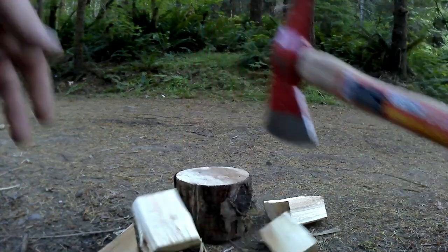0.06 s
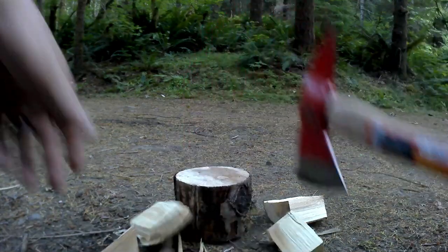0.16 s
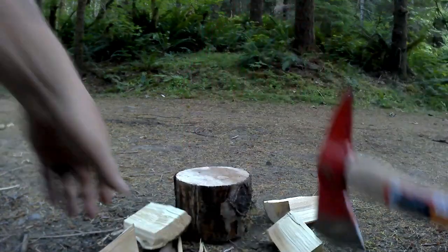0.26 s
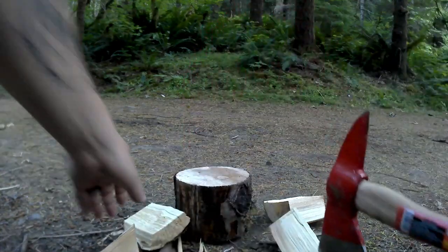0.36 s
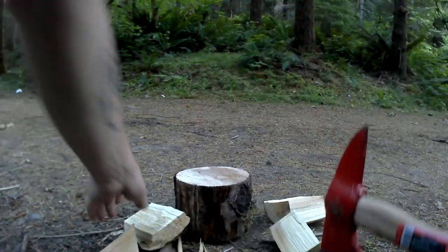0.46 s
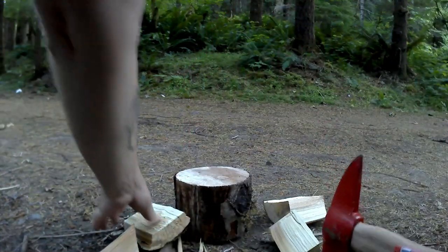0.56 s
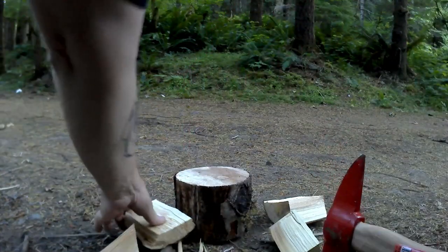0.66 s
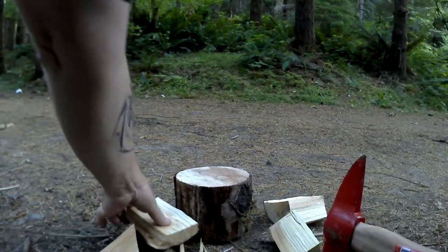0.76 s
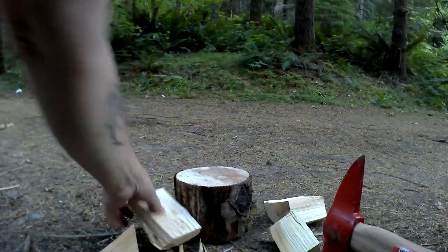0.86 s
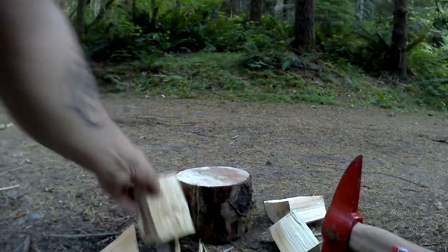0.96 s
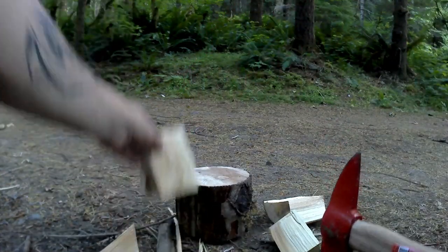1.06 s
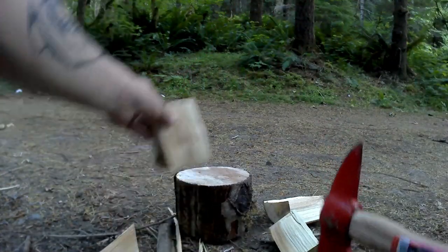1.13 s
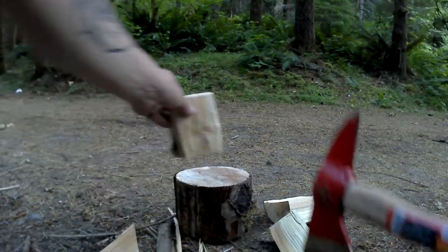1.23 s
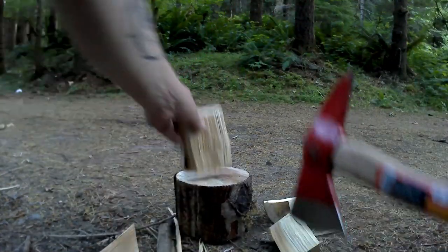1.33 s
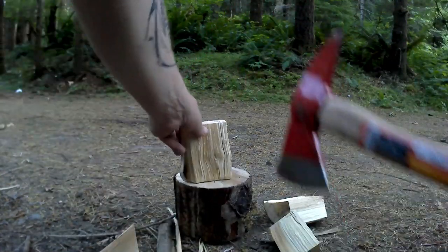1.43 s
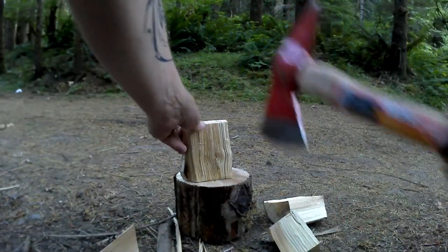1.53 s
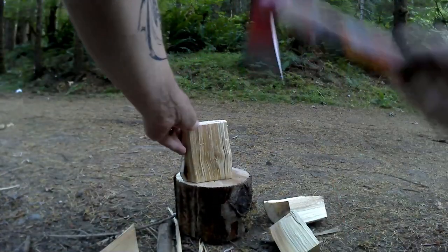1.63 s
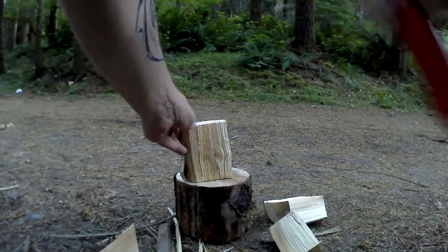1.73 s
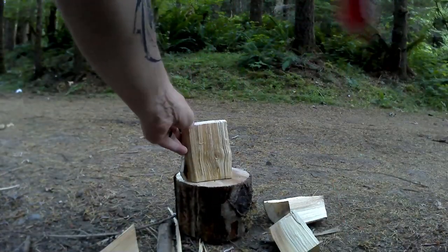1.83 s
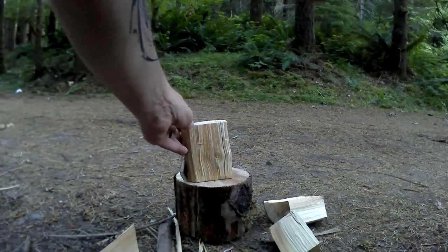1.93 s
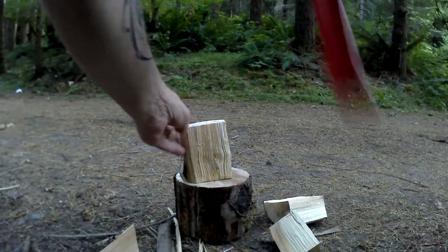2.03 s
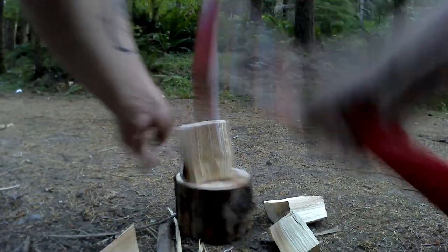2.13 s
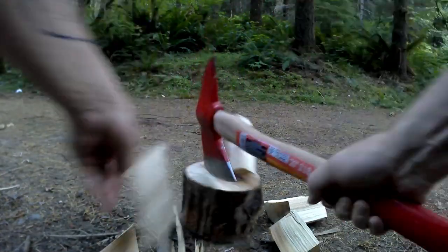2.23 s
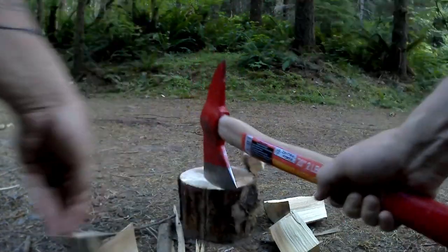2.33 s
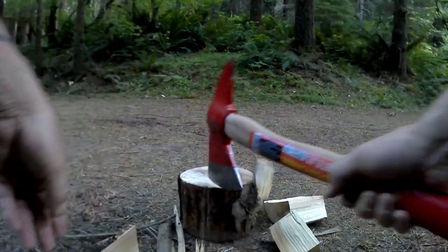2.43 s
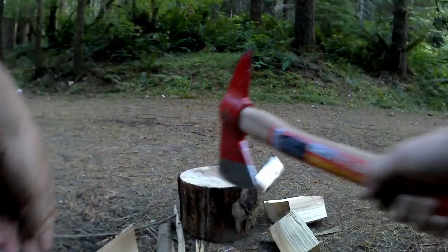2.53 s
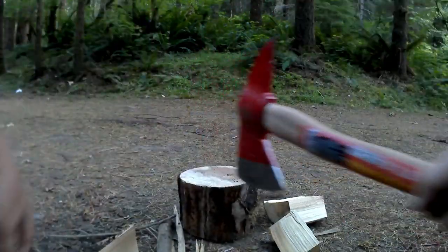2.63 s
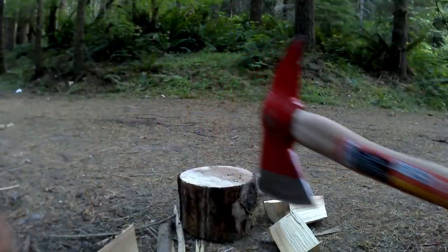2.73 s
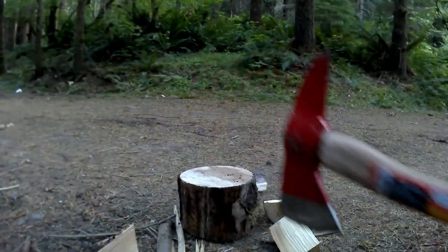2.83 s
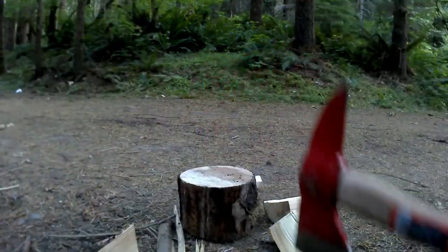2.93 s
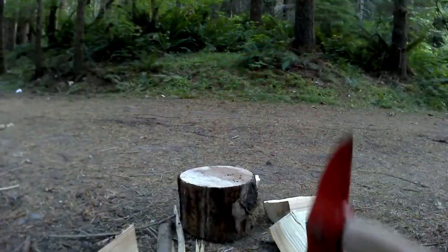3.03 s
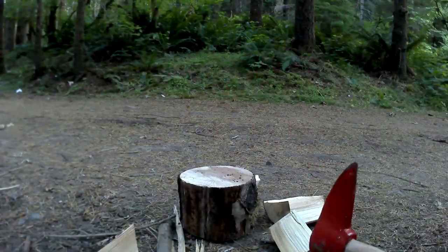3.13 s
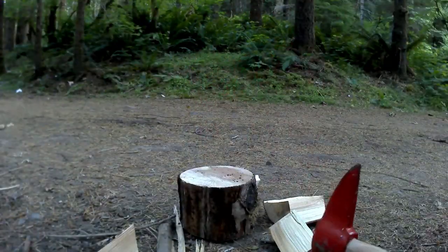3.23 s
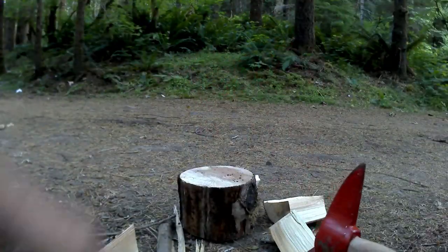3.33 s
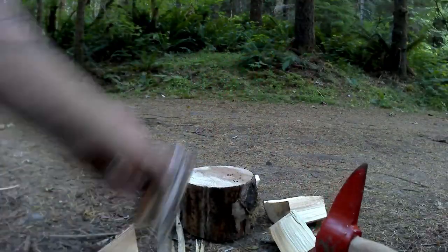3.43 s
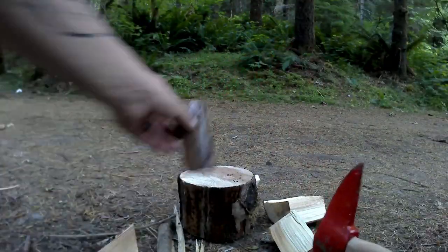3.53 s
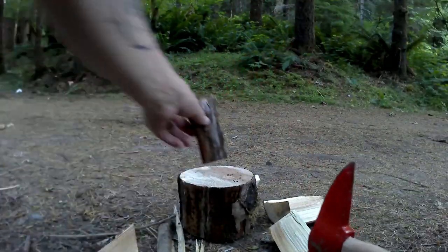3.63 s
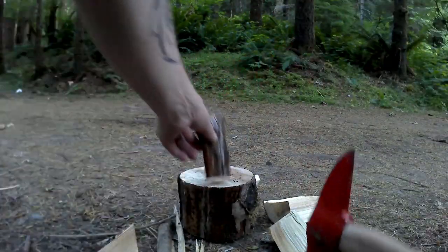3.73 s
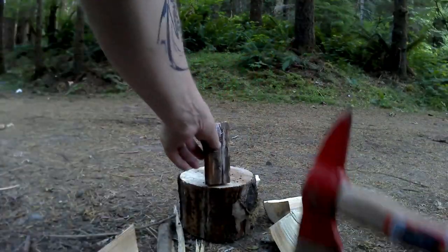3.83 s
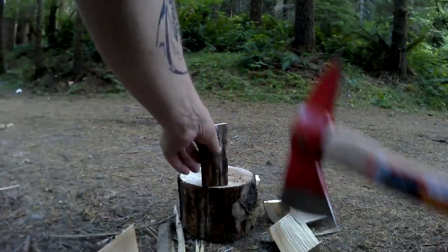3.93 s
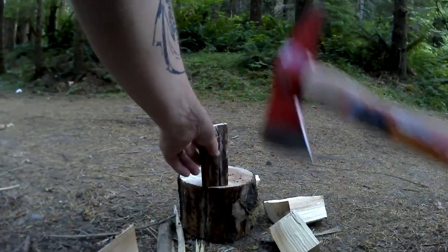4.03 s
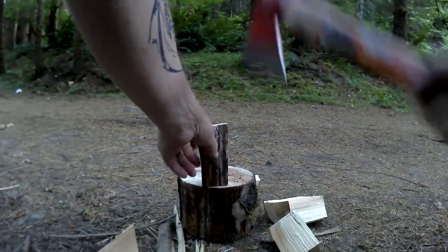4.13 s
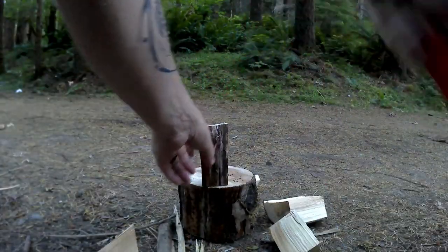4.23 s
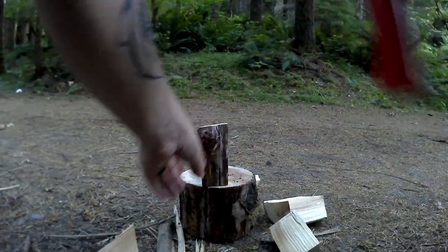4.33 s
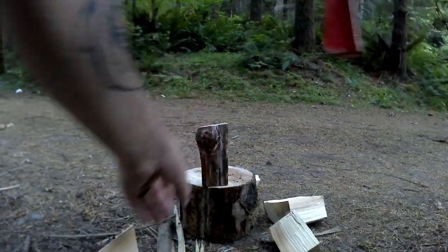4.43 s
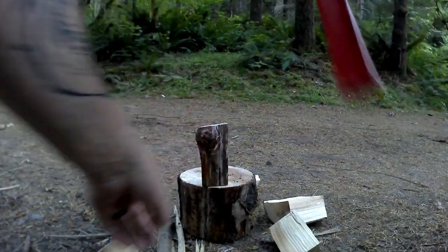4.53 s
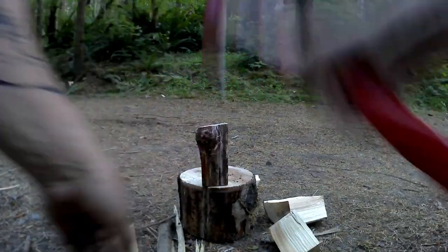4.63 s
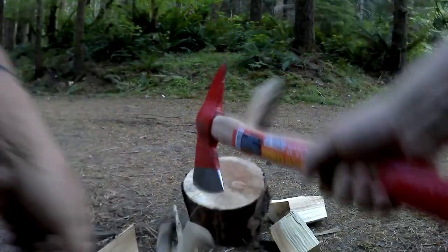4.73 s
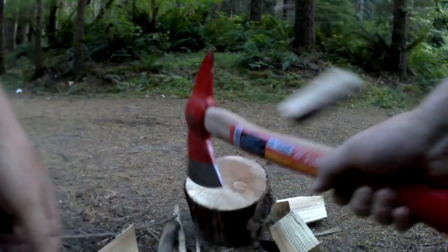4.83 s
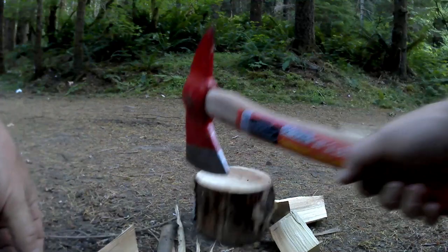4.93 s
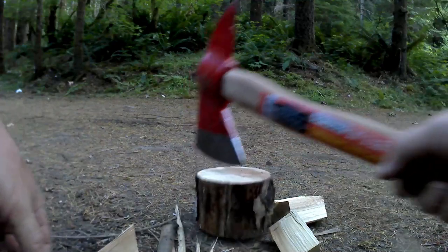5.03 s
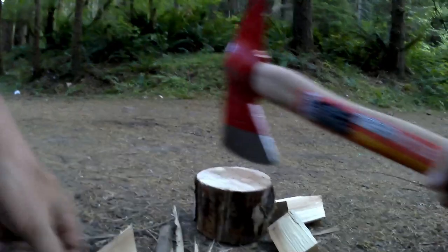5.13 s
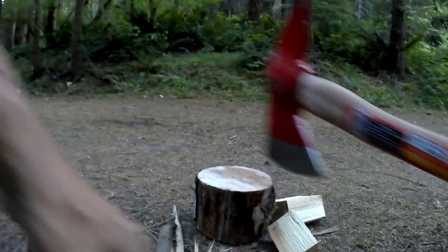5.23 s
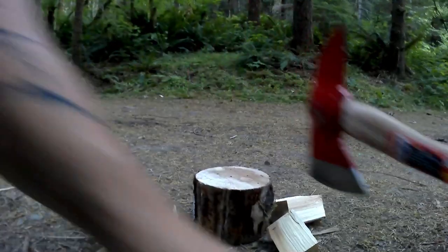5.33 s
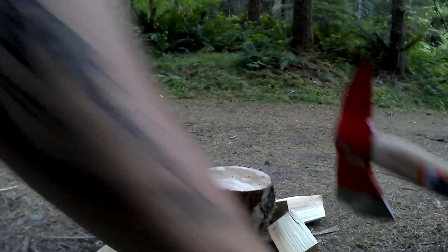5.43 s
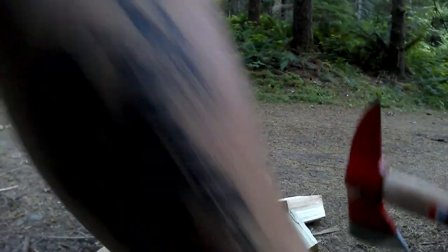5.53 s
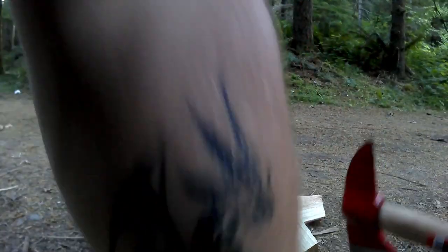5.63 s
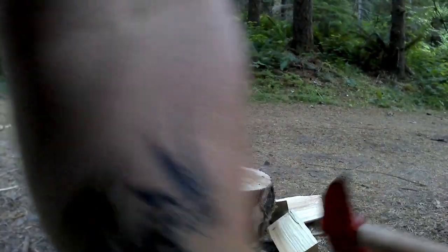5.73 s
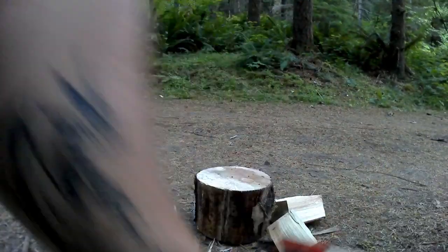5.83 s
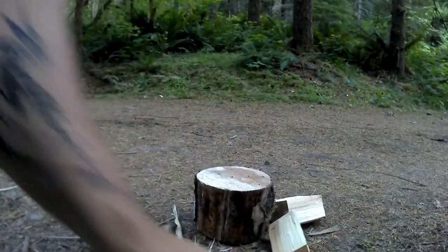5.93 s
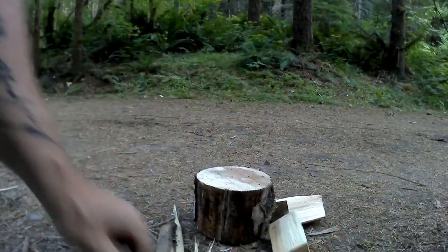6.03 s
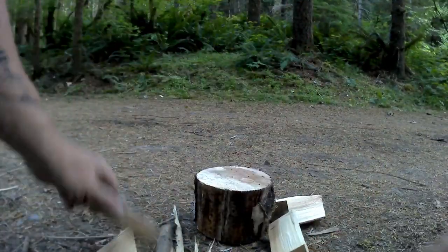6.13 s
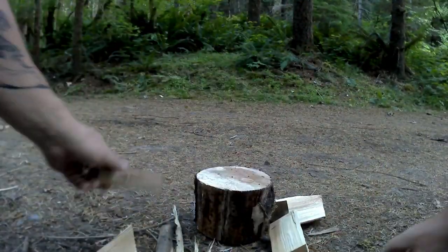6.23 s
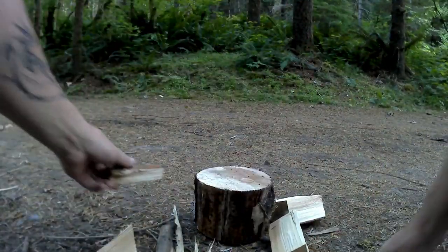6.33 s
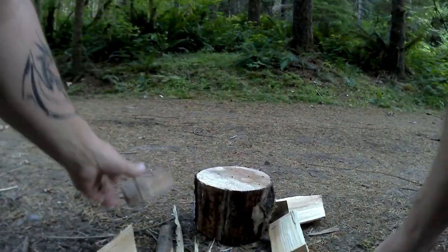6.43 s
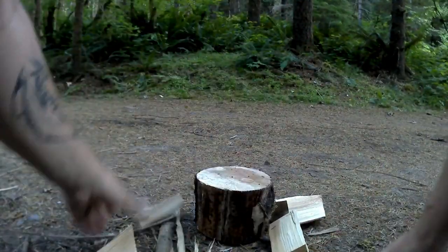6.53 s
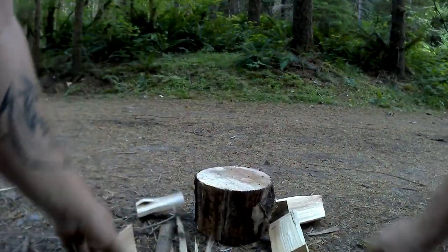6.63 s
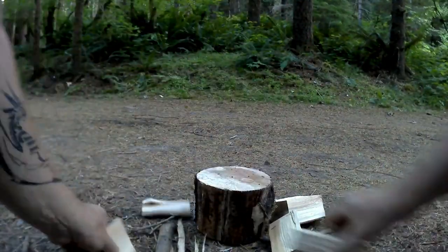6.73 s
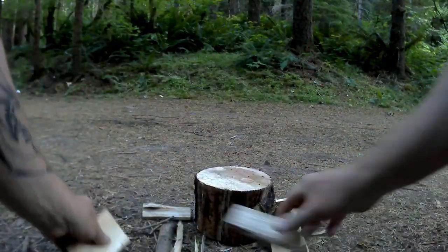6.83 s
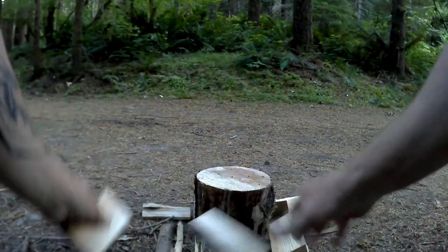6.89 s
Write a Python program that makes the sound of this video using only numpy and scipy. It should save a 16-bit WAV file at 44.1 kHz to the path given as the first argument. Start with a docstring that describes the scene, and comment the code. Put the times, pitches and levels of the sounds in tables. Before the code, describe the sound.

Two sharp, close hatchet chops crack through firewood outdoors, with tumbling wood, a loud rattling knock on the stand, then the tool laid down.

```python
"""A hatchet splits two billets on a chopping block in a forest clearing, close enough to overload the microphone.
Each blow is a sum of ringing wood modes, a knock, a thud and snapping fibres; the steel head rings along.
The halves clatter to the ground, one flies against the camera stand, which rings and rattles; the hatchet is
laid down and sticks are tossed aside. Shaped noise makes the scuffs, steps, shaking and faint rush of the forest.
The trees scatter every blow as a noisy wash, and a far edge of the forest answers about a second later."""
import sys
import numpy as np
from scipy import signal
from scipy.fft import rfft, irfft, next_fast_len
from scipy.io import wavfile
from scipy.ndimage import uniform_filter1d, map_coordinates

SR = 44100
rng = np.random.default_rng(int(sys.argv[2]) if len(sys.argv) > 2 else 0)


def unload_wav(signal):
    """Save mono or channel-first audio to the path in sys.argv[1] as 16-bit WAV at rate SR, clipped to [-1, 1]."""
    wavfile.write(
        sys.argv[1],
        SR,
        np.round(np.clip(np.atleast_2d(signal).T, -1, 1) * 32767).astype(np.int16),
    )


N = 306936  # length in samples, about 7 s
T = np.arange(SR // 5) / SR  # time within one contact, in seconds


def amp(db):
    """Decibels to gain."""
    return 10 ** (np.asarray(db) / 20)


def unit(x):
    """Scale to rms 1."""
    return x / np.sqrt(np.mean(x ** 2) + 1e-20)


def burst(x, size=220):
    """Scale so that the loudest 5 ms have rms 1."""
    power = uniform_filter1d(x ** 2, size, mode="constant")
    return x / np.sqrt(power.max() + 1e-20)


def fade(t, t60):
    """Exponential decay by 60 dB in t60 seconds."""
    return np.exp(-np.log(1000) * t / max(t60, .001))


def wobble(rate, size=N):
    """A smooth random curve, rate knots a second."""
    knots = rng.standard_normal(int(size * rate / SR) + 4)
    return map_coordinates(knots, [np.arange(size) * rate / SR])


def along(points, hz):
    """Read (Hz, value) points on a log axis."""
    f, v = np.transpose(points)
    return np.interp(np.log(hz + 1), np.log(f + 1), v)


def coloured(x, points):
    """Causal minimum-phase filter with the gain of (Hz, dB) points."""
    m = 2 * next_fast_len(len(x))
    gain = amp(along(points, np.fft.rfftfreq(m, 1 / SR)))
    cepstrum = irfft(np.log(gain))
    cepstrum[1:m // 2] *= 2  # fold the cepstrum onto positive time
    cepstrum[m // 2 + 1:] = 0
    return irfft(rfft(x, m) * np.exp(rfft(cepstrum)))[:len(x)]


def swell(rows, rise, t60):
    """Gain per sample of (s, length s, dB) gestures: each rises, holds for its length and dies away."""
    t = np.arange(N) / SR
    gain = np.zeros(N)
    for s, length, db in rows:
        onset = 1 - fade(np.maximum(t - s, 0), rise)
        release = fade(np.maximum(t - s - length, 0), t60)
        gain += amp(db) * onset * release
    return gain


def ring(modes, t, scale=1, scatter_db=3.0):
    """Damped modes, struck at slightly new strengths; neighbours swing in opposite senses."""
    total = np.zeros(len(t))
    for k, (hz, db, t60) in enumerate(modes):
        strength = (-1) ** k * amp(db + scatter_db * rng.standard_normal())
        total += strength * fade(t, t60) * np.sin(2 * np.pi * hz * scale * t)
    return total


def add(track, s, sound):
    """Mix a sound in at s seconds."""
    part = track[round(s * SR):][:len(sound)]
    part += sound[:len(part)]


# The blade bites, tears through and lands in the block, close to the microphone.
# Each row: start in seconds, level in dB, clack in Hz, hardness in dB, knock in dB, knock in Hz.
CHOPS = [(2.059, -5.5, 927, -4, -16, 325), (2.064, -21, 1000, 3.5, -7, 465),
         (2.077, -17, 790, -2.5, -7, 440), (2.0915, -12.5, 1049, -8.5, 3, 439),
         (2.0945, -14.5, 999, -4, 8, 322), (4.588, -13, 988, 3, -2, 468),
         (4.591, -15.5, 907, -4.5, 6.5, 368), (4.607, -26, 956, -3.5, 6, 360),
         (4.635, -23.5, 760, -6, 7, 400), (4.653, -25, 736, -4.5, 5.5, 254), (4.66, -24, 930, -6, -1, 354),
         (4.671, -16.5, 930, 4.5, -7, 469)]
# What each support does to a contact: knock t60 in seconds, thud in dB, snap in dB (both relative).
ON_BLOCK, ON_WOOD, ON_SOIL, ON_PILE = (.05, -6.5, -20), (.075, -20, -16.5), (.035, -5.5, -16), (0.019, -9, -12)


def chops():
    """The hatchet drives through each billet into the block, as blows with tearing grain."""
    return blows(CHOPS, ON_BLOCK) + splinters()


# Each split tears fibres and rings the steel head.
# Each row: start in seconds, length in seconds, tearing in dB, steel ring in dB.
SPLITS = [(2.059, 0.049, -36, -28.5), (4.589, .025, -33, -25)]
# Colour of the tearing grain. Each row: frequency in Hz, gain in dB.
SPLINTER_COLOUR = [(100, -14), (450, 9.5), (1200, 3), (2300, -4), (3500, -21), (6300, -18.5),
                   (10000, -27.5), (16000, -35.5)]


def splinters():
    """Dense tiny fractures run along the grain during each split."""
    track = np.zeros(N)
    for s, length, db, _ in SPLITS:
        fractures = rng.standard_normal(len(T)) * np.exp(0.61 * wobble(1200, len(T)))
        tearing = unit(coloured(fractures, SPLINTER_COLOUR))
        add(track, s, amp(db) * tearing / (1 + (T / max(length, .005)) ** 8))
    return track


THUD_PER_KNOCK, SNAP_PER_HARDNESS = .4, 0.96  # dB per dB: heavy contacts push deeper, hard ones break more fibres


def blows(rows, support):
    """A series of contacts on one support; the thud follows the knock, the snap follows the hardness."""
    knock_t60, thud_db, snap_db = support
    track = np.zeros(N)
    for s, db, clack_hz, hard_db, knock_db, knock_hz in rows:
        thud = thud_db + THUD_PER_KNOCK * knock_db
        snap = snap_db + SNAP_PER_HARDNESS * hard_db
        add(track, s, amp(db) * contact(clack_hz, hard_db, knock_db, knock_hz, knock_t60, thud, snap))
    return track


# Lower cross-grain modes of a billet.
# Each row: multiple of the clack pitch, relative level in dB, t60 in seconds.
BILLET_MODES = [(.7, -3.5, 0.028), (.84, -0.5, 0.026), (1.0, 3.5, 0.033), (1.17, -2, .028),
                (1.36, -6, 0.034), (1.6, -8.5, .03)]
# Higher modes of a billet, reached by hard contacts.
# Each row: frequency in Hz before the hardness shift, relative level in dB, t60 in seconds.
CRACK_MODES = [(1430, 1, 0.039), (1600, 3.5, 0.043), (1811, 4, 0.029), (2153, -3, 0.016), (2408, -5, 0.049),
               (2567, -14.5, 0.045)]
# Colour of the snapping fibres. Each row: frequency in Hz, gain in dB.
SNAP_COLOUR = [(300, -15.5), (1200, 6), (2400, 5.5), (3300, -2), (4500, -8.5), (6500, -6), (10000, -17.5),
               (16000, -23)]


def contact(clack_hz, crack_db, knock_db, knock_hz, knock_t60, thud_db, snap_db):
    """One blow on wood: cross-grain modes, lengthwise knock, a push into the support and snapping fibres."""
    press = 1 - fade(T, 0.0038)  # the contact force takes a moment to build
    grip = fade(T, 0.011) + 0.39  # the support soaks up most of the first swings
    size = .3 * np.log(clack_hz / 930)  # smaller pieces ring higher in all their modes
    # hard contacts sound higher
    pitch = np.clip(1 + size + .009 * crack_db + 0.025 * rng.standard_normal(), .85, 1.2)
    clack = burst(press * ring(BILLET_MODES, T, clack_hz) * grip)
    crack = burst(press * ring(CRACK_MODES, T, pitch) * grip)
    knock_decay = fade(T, knock_t60) + 2.8 * fade(T, 0.013)
    knock = burst(press * np.sin(2 * np.pi * knock_hz * T) * knock_decay)
    thud = burst(press * np.sin(2 * np.pi * 135 * T) * fade(T, 0.0073))
    fibres = rng.standard_normal(len(T)) * np.exp(0.58 * rng.standard_normal(len(T)))
    snap_decay = fade(T, 0.024) + 0.15 * fade(T, .16)
    snap = burst(coloured(press * fibres * snap_decay, SNAP_COLOUR))
    low = amp(knock_db - 1.0) * knock + amp(thud_db - 7.0) * thud
    high = amp(crack_db - 7.5) * crack + amp(snap_db + 3) * snap
    return amp(-7) * clack + high + low


# The steel head. Each row: frequency in Hz, relative level in dB, t60 in seconds.
STEEL_MODES = [(2090, -5, .08), (2185, -3, 0.12), (3080, -13, 0.06), (4985, -23, 0.0429), (5870, -19, 0.11),
               (5930, -21, 0.11), (10200, -27, .1), (13900, -31, .1)]
# The hatchet is laid on the woodpile.
# Each row: start in seconds, level in dB, clack in Hz, hardness in dB, knock in dB, steel ring in dB.
LAID = [(5.913, -17.5, 863, -13.5, -4.5, -31.5), (5.972, -39, 999, -5, 1.5, -45),
        (6.09, -37, 1000, 2, -4, -37), (6.095, -32, 720, -4, 3, -39), (6.146, -36.5, 700, -13, -7, -58),
        (6.193, -41.5, 940, -4, -9, -50.5)]


def steel():
    """Close pairs of modes in the hatchet head beat and chatter against the wood."""
    track = np.zeros(N)
    for s, *_, db in SPLITS + LAID:
        chatter = np.exp(.15 * wobble(160, len(T)))
        add(track, s, amp(db) * ring(STEEL_MODES, T) * chatter)
    return track


# Wood meets wood and rings freely.
# Each row: start in seconds, level in dB, clack in Hz, hardness in dB, knock in dB, knock in Hz.
CLACKS = [(0.04, -35, 730, -8, -5, 467), (0.047, -18, 834, -8.5, -11.5, 510),
          (0.15, -37, 910, -12, -16, 310), (0.175, -27.5, 780, -12, -7.5, 360),
          (0.211, -31, 845, -6.5, 1, 316), (0.477, -39, 1080, -12, -11.5, 417),
          (0.858, -44.5, 1175, -3.5, -1, 400), (1.002, -58, 781, -10, 6.5, 343),
          (1.284, -30, 1100, 2, -10, 420), (1.325, -47, 977, -18, 1, 490),
          (2.519, -27.5, 844, -16, 2.5, 494), (2.607, -34.5, 787, -12, 0, 540),
          (2.77, -61.5, 773, -9, 9.5, 342), (3.699, -44.5, 802, -11, -3.5, 363),
          (4.79, -37.5, 695, -6, -2.5, 474), (4.925, -32, 703, 0, -1.5, 490),
          (5.878, -36, 1080, -3.5, 4.5, 455), (6.437, -48, 1140, 12.5, 12.5, 420),
          (6.453, -40.5, 764, -3, 14, 416), (6.502, -45.5, 1006, 6.5, 1.5, 340),
          (6.923, -23, 1200, 4, -9, 411), (6.928, -32, 1050, -6, 2, 412)]
# A piece lands on the soil, which damps it.
# Each row: start in seconds, level in dB, clack in Hz, hardness in dB, knock in dB, knock in Hz.
LANDINGS = [(0.332, -42.5, 1070, -9.5, -4.5, 497), (2.222, -37, 762, -13, -6, 300),
            (2.243, -31.5, 991, -11, -9, 409), (2.255, -35, 703, -7.5, -3, 284),
            (2.371, -28.5, 960, -14, 2.5, 360), (2.643, -42, 1160, -2, 0, 470),
            (2.652, -48, 914, -11, 11, 338), (4.871, -19.5, 985, -17.5, .5, 246),
            (4.914, -29.5, 926, -10, 3.5, 382), (5.516, -40, 850, -8, 7.5, 366),
            (5.644, -42, 942, -5, 2, 249), (5.673, -44, 890, -16, 7, 334), (6.358, -44, 703, -25, 1, 590),
            (6.374, -39, 676, -26, -3, 540), (6.601, -52, 1095, -9, 11, 423)]
LAID_KNOCK_HZ = 425


def clatter():
    """Pieces knock together or drop to the soil, and the hatchet settles on the woodpile."""
    laid = [(*row, LAID_KNOCK_HZ) for *row, ring_db in LAID]
    return blows(CLACKS, ON_WOOD) + blows(LANDINGS, ON_SOIL) + blows(laid, ON_PILE)


# A flying piece strikes the camera stand: start in seconds, level in dB before the housing,
# clack in Hz, hardness in dB, knock in dB, knock in Hz.
JOLT = (5, -6, 759.5, -7, -5.5, 219.5)
ON_STAND = (0.044, -9, -16.5)  # knock t60 in seconds, relative thud and snap in dB
# The camera on its stand. Each row: frequency in Hz, level in dB, t60 in seconds.
STAND_MODES = [(87, -11, .2), (122, -3, .15), (205, -13, .12), (332, -9.5, .13), (502, -9.5, .125),
               (1074, -19, .12), (1428, -21, .11)]
# Path of the rattle into the camera. Each row: frequency in Hz, gain in dB before a 3 dB lift.
HOUSING = [(100, -1), (1500, 0), (2300, -5), (4000, -2.5), (7000, 1.5), (12000, 0)]


def stand():
    """The blow travels through the stand into the camera, which rings and rattles."""
    rattle = blows([JOLT] + rebounds(), ON_STAND)
    track = amp(3.0) * coloured(rattle, HOUSING)
    add(track, JOLT[0], ring(STAND_MODES, T, scatter_db=.5))
    return track


REBOUNDS, FIRST_GAP_S, GAP_GROWTH = 10, .005, 1.2  # each gap is longer than the last by this factor
RATTLE_DB, RATTLE_FALL_DB_PER_S = -6.5, 165  # level before the housing, and its fall
RATTLE_CLACK_HZ, RATTLE_KNOCK_HZ, RATTLE_SCATTER = 1200, 427, .14  # starting pitches and their relative spread
RATTLE_SAG_OCT_PER_S = 8  # the clack of later, weaker rebounds sounds lower
RATTLE_HARDNESS_DB, RATTLE_KNOCK_DB = -9.5, -4.5
RATTLE_JITTER_S, RATTLE_SCATTER_DB = .0009, 1.5  # unevenness of the rebounds


def rebounds():
    """Uneven contacts of the rattle after the jolt: on average ever wider apart, weaker and lower."""
    rows = []
    for t in np.cumsum(FIRST_GAP_S * GAP_GROWTH ** np.arange(REBOUNDS)):
        late, loud, clack, knock = rng.standard_normal(4)
        s = JOLT[0] + t + RATTLE_JITTER_S * late
        db = RATTLE_DB - RATTLE_FALL_DB_PER_S * t + RATTLE_SCATTER_DB * loud
        clack_hz = RATTLE_CLACK_HZ * 2 ** (-RATTLE_SAG_OCT_PER_S * t) * np.exp(RATTLE_SCATTER * clack)
        knock_hz = RATTLE_KNOCK_HZ * np.exp(RATTLE_SCATTER * knock)
        rows.append((s, db, clack_hz, RATTLE_HARDNESS_DB, RATTLE_KNOCK_DB, knock_hz))
    return rows


# Movement nearby, the jolt and the footfalls set the camera shaking.
# Each row: start in seconds, length in seconds, level in dB.
SHAKES = [(0.0, .25, -60), (2.4, .3, -58.5), (5.0, 0.12, -35.5), (5.6, 0.044, -40), (6.02, .13, -53.5)]
SHAKE_RISE_S, SHAKE_T60 = .08, 1.0  # seconds
# Colour of the shaking. Each row: frequency in Hz, gain in dB.
SWAY_COLOUR = [(12, -30), (20, 0), (43, 1), (52, -4.5), (65, -16.5), (92, -14), (120, -18.5), (160, -46.5),
               (260, -120)]


def sway():
    """The jolted camera keeps shaking, heard as a deep uneven rumble of low noise."""
    rumble = unit(coloured(rng.standard_normal(N), SWAY_COLOUR))
    return swell(SHAKES, SHAKE_RISE_S, SHAKE_T60) * rumble


# Wood and hands scuff over bark and needles. Each row: start in seconds, length in seconds, level in dB.
SCUFFS = [(0.0, .17, -50.5), (1.33, .06, -54.5), (2.56, 0.091, -51.5), (5.55, 0.18, -52.5),
          (5.86, .24, -52), (6.35, 0.25, -54.5)]
SCUFF_RISE_S, SCUFF_T60 = 0.075, 0.93  # seconds
# Colour of the forest litter. Each row: frequency in Hz, gain in dB.
LITTER_COLOUR = [(88, -29.5), (150, -1), (714, -5.5), (1430, -8.5), (2230, -15), (3970, -36.5),
                 (5840, -30.5), (7790, -44.5), (9820, -43.5), (15000, -56)]
# Weight shifts on soft ground. Each row: start in seconds, length in seconds, level in dB.
STEPS = [(5.585, 0.05, -35), (5.825, 0.021, -45.5), (5.965, .02, -40.5)]
STEP_RISE_S, STEP_T60 = 0.057, 0.34  # seconds
# Colour of a step on the soil. Each row: frequency in Hz, gain in dB.
SOIL_COLOUR = [(29, -31), (50, -1), (59, -4), (135, 1.5), (167, -14), (220, -9.5), (320, -19.5),
               (420, -40.5), (700, -120)]


def ground():
    """Dry needles rustle and tiny twigs tick under scuffs; the soil thumps under a step."""
    needles = unit(rng.standard_normal(N) * np.exp(0.36 * wobble(900) + 0.66 * wobble(32)))
    twigs = unit((rng.random(N) < 70 / SR) * rng.standard_normal(N))  # about 70 ticks a second
    litter = unit(coloured(needles + .3 * twigs, LITTER_COLOUR))
    soil = unit(coloured(rng.standard_normal(N), SOIL_COLOUR))
    scuffs = swell(SCUFFS, SCUFF_RISE_S, SCUFF_T60) * litter
    return scuffs + swell(STEPS, STEP_RISE_S, STEP_T60) * soil


def scatter(x, delay, rise, t60, spectrum, patchy_db):
    """Countless small reflections smear the energy of x into a patchy, dying wash."""
    t = np.arange(2 * SR) / SR
    response = (fade(t, t60) * (1 - fade(t, rise))) ** 2
    energy = np.abs(signal.fftconvolve(x ** 2, response / response.sum()))
    wash = np.zeros(N)
    add(wash, delay, np.sqrt(energy))
    patchy = rng.standard_normal(N) * amp(patchy_db * wobble(82))
    return wash * unit(coloured(patchy, spectrum))


# Colour of the scatter from the trunks. Each row: frequency in Hz, gain in dB.
TREES_COLOUR = [(35, -31.5), (60, -1), (347, -5.5), (619, -7.5), (1080, -8.5), (2420, -20), (3930, -40.5),
                (5680, -32.5), (7860, -54), (9670, -48), (15000, -56)]
# Colour of the distant echo. Each row: frequency in Hz, gain in dB.
FAR_EDGE_COLOUR = [(29, -33.5), (50, -4), (125, -2), (212, -9), (442, -6), (595, -13), (1180, -12.5),
                   (6610, -44.5), (7940, -50), (12000, -51.5), (15600, -74.5), (22000, -120)]
# Echoes from the far edge. Each row: delay in seconds, level in dB, build-up in seconds, t60 in seconds.
ECHOES = [(0.958, -34.5, 0.009, 0.18), (1.0, -34.5, 0.072, 0.71)]


def forest(x, near_db, near_t60):
    """Scatter from the surrounding trees and late echoes from the far edge."""
    wash = amp(near_db) * scatter(x, 0.0078, 0.026, near_t60, TREES_COLOUR, patchy_db=2.5)
    for delay, db, rise, t60 in ECHOES:
        wash += amp(db) * scatter(x, delay, rise, t60, FAR_EDGE_COLOUR, patchy_db=1.5)
    return wash


AIR_DB = -60.5  # mean level
# Colour of the forest background. Each row: frequency in Hz, gain in dB.
AIR_COLOUR = [(12, -30), (20, -1.5), (33, -2), (49, -18.5), (96, -11), (204, -21.5), (293, -19), (388, -21),
              (574, -22), (759, -21), (1440, -23.5), (1860, -29), (3950, -44), (7730, -51.5),
              (16000, -61.5)]


def air():
    """Faint, nearly steady rush of the forest, as coloured noise."""
    level = amp(AIR_DB + .6 * wobble(6.8))
    return level * unit(coloured(rng.standard_normal(N), AIR_COLOUR))


def overload(x, top, hardness=6):
    """Rounded clipping at the level top."""
    return x / (1 + np.abs(x / top) ** hardness) ** (1 / hardness)


# Small pieces radiate little deep bass. Each row: frequency in Hz, gain in dB.
RADIATION = [(20, -11), (50, -7.5), (100, 0), (200, 1)]


def scene():
    """Airborne blows saturate the microphone; the jolt through the stand has more headroom and radiates less."""
    wood = coloured(chops() + clatter() + steel(), RADIATION)
    jolt = stand()
    radiated = amp(-0.5) * wood + amp(-8) * jolt
    outdoors = wood + forest(radiated, near_db=-25, near_t60=1.76) + ground() + air()
    return (overload(outdoors, top=0.4) + overload(jolt, top=0.89) + sway())[None]


# Microphone low cut and port notch. Each row: frequency in Hz, gain in dB.
PORT = [(3, -39.5), (10, -22), (19, 2.5), (6800, -2.5), (7500, -10.5), (8100, -22), (8700, -6), (9500, 1),
        (11000, -4), (12500, -5.5), (14500, -2)]
TOP_HZ = 16000  # band limit


def record(dry):
    """The microphone port cuts a notch in the treble; nothing passes above the band limit."""
    sound = coloured(dry[0], PORT)
    passed = np.fft.rfftfreq(N, 1 / SR) < TOP_HZ
    return irfft(rfft(sound) * passed, N)[None]


dry = scene()
out = record(dry)
unload_wav(out)
```